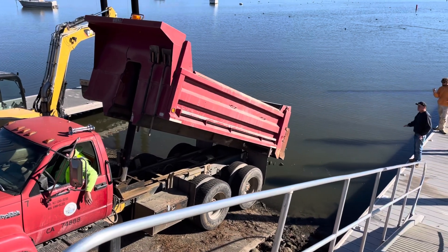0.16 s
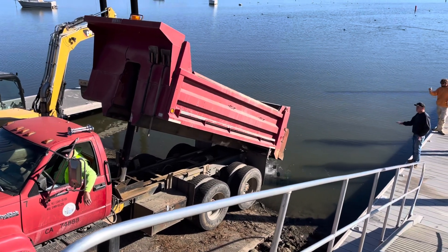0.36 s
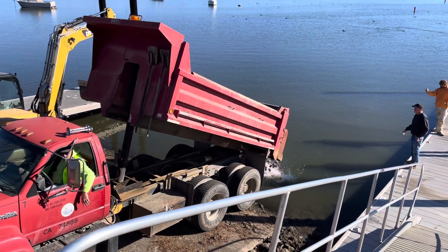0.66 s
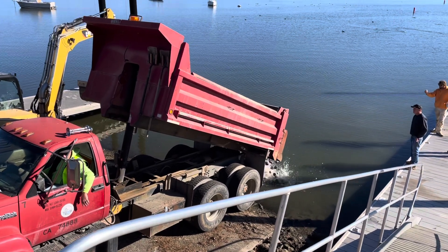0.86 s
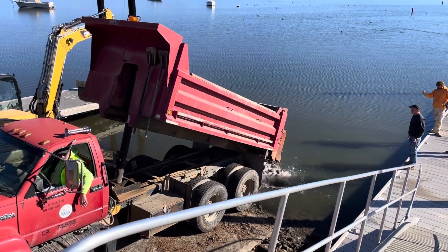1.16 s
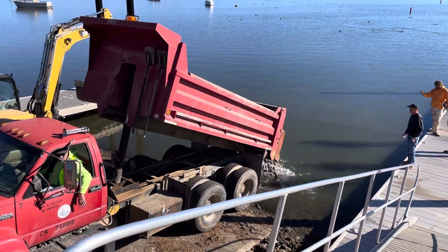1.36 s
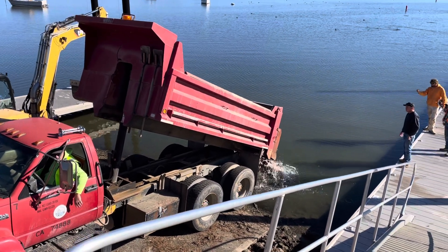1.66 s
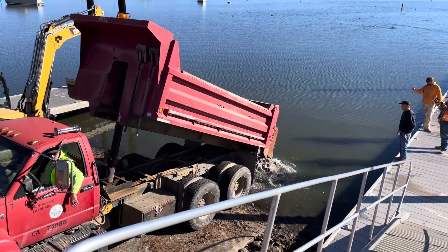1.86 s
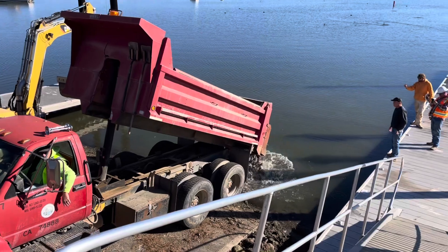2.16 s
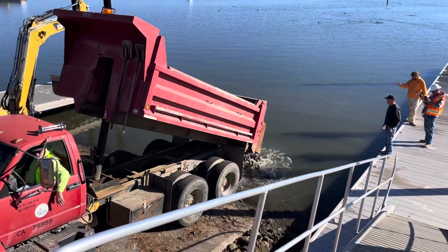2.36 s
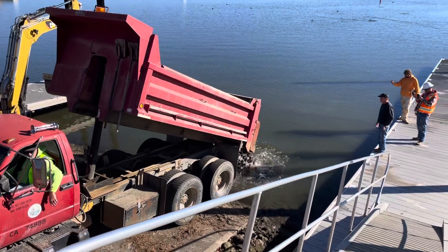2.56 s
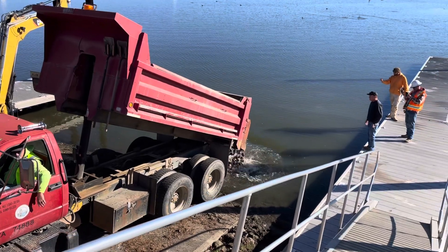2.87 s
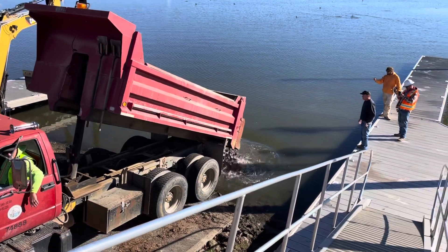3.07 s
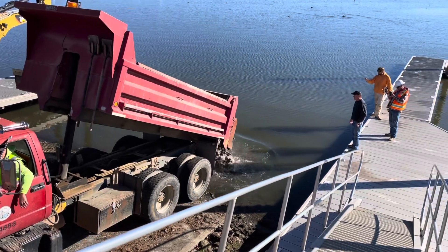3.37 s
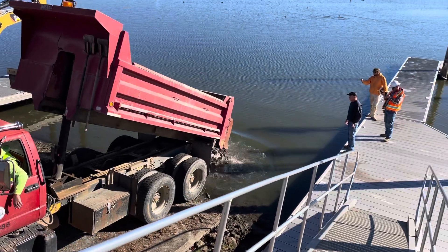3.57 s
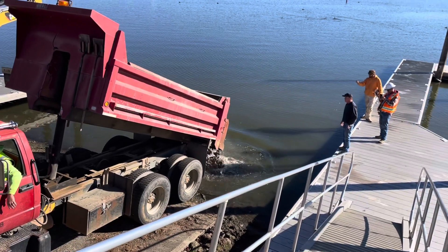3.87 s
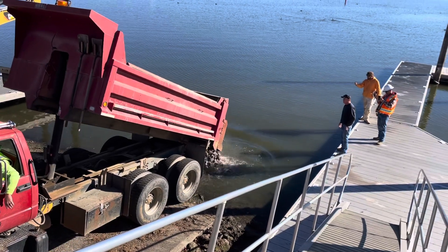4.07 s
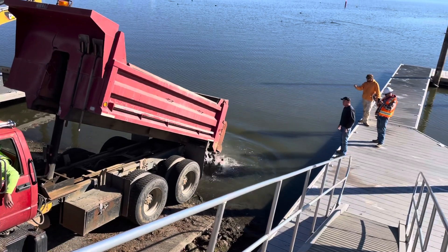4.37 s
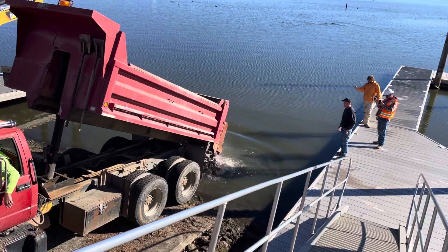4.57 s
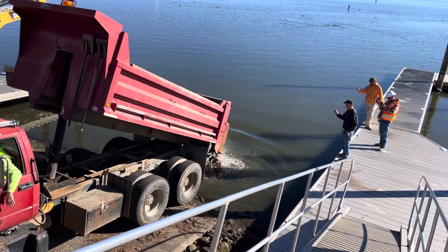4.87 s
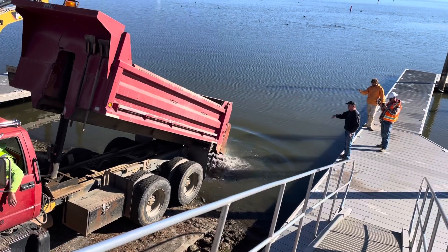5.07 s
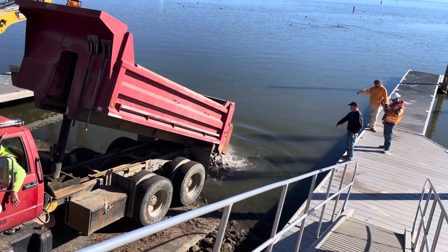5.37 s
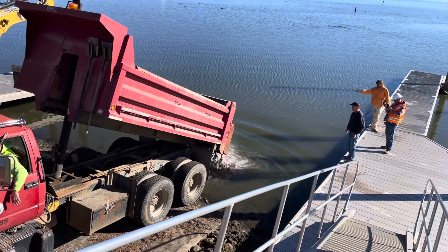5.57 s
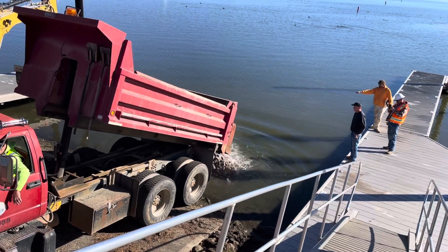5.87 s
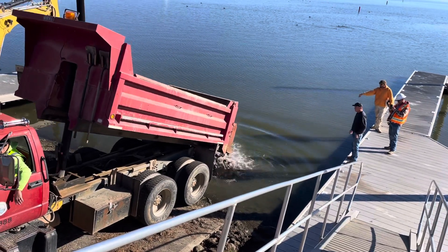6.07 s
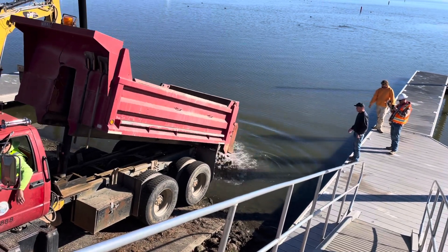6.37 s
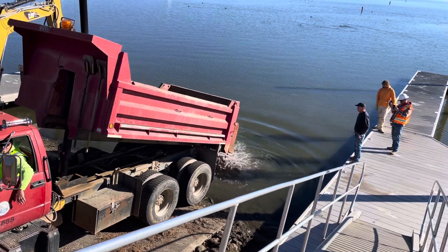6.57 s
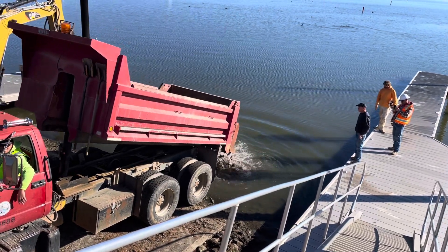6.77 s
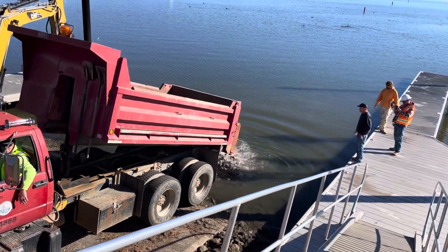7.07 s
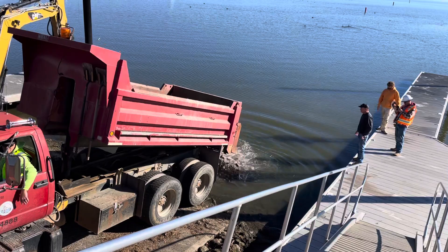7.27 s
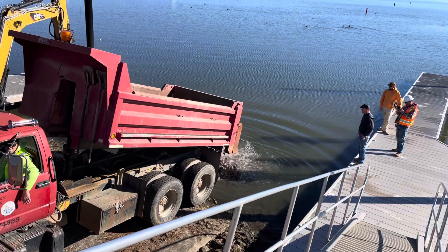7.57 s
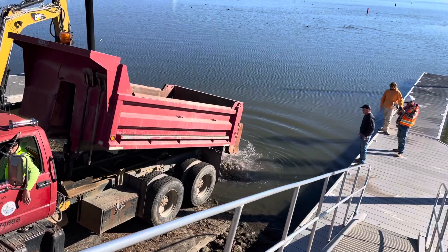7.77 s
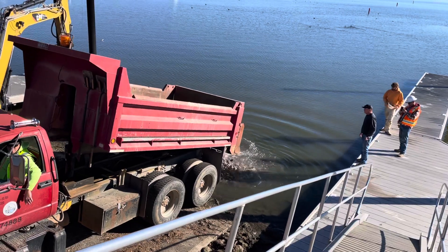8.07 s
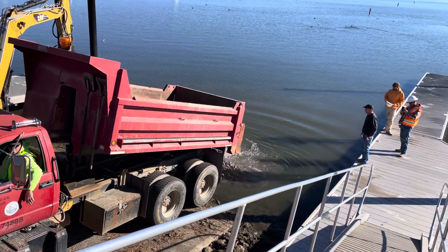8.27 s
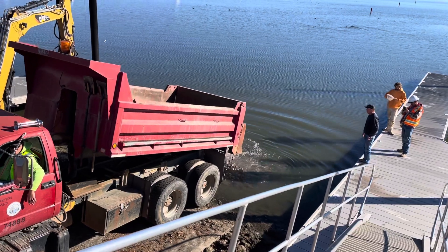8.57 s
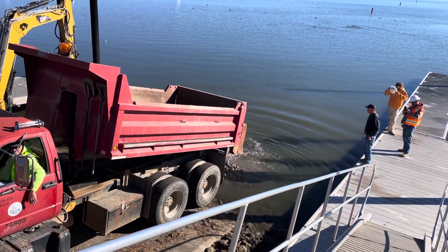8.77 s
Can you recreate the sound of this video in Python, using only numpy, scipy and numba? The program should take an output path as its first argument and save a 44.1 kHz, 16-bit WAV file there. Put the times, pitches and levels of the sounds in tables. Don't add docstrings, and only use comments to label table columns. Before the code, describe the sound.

Outdoors at a lakeside ramp, a truck tips crushed rock into the water. It starts loudest, with heavy bangs on the steel bed and dense stone clatter, then runs as a rough, surging rush with thin spray hiss. After about seven seconds it thins to separate knocks and ticks over diesel idle. Stereo phone some metres away.

```python
import sys
import numpy as np
from scipy import signal
from scipy.fft import rfft, irfft
from scipy.io import wavfile
from scipy.ndimage import uniform_filter1d
from numba import njit

SR = 44100
rng = np.random.default_rng(int(sys.argv[2]) if len(sys.argv) > 2 else 0)


def amplitude_ratio(level_db):
    exponent = np.asarray(level_db, float) / 20
    return 10 ** exponent


def pcm_store(signal):
    levels = np.round(np.clip(np.atleast_2d(signal), -1, 1) * 32767)
    wavfile.write(sys.argv[1], SR, levels.astype(np.int16).T)


N = 394075
PLACES = 6

# time in seconds, flow of rock in dB, share of big blocks in dB, splash in dB.
FLOW = [(0, -19.5, 4, -49.5), (.4, -21, -4, -54), (.45, -18.5, -2, -48.5), (.88, -19, 0, -52.5),
        (.98, -21.5, 1, -53), (1.5, -21.5, -0.5, -54.5), (2.05, -22.5, -0.5, -54), (2.75, -22.5, -2, -51.5),
        (4.1, -24, -1.5, -52), (5.3, -23, -3.5, -52.5), (6.05, -22.5, -5, -52.5), (6.25, -23.5, -1, -55),
        (6.55, -23, -1, -55), (6.85, -27, -0.5, -61), (7.4, -32.5, 0, -61.5), (7.75, -33, 1.5, -67),
        (8.0, -44, 8, -68), (8.55, -51, 6, -69), (8.94, -50.5, -4, -69)]
# start in seconds, level in dB, fade in seconds, share of big blocks in dB.
SLUMPS = [(.03, -22, 0.021, -17), (.17, -16.5, 0.029, -6), (0.201, -13, 0.012, 9), (.32, -15.5, 0.034, -1),
          (.56, -20, 0.024, 1), (.68, -24, 0.028, -6), (.775, -16.5, 0.028, -11.5), (1.08, -28, 0.05, -7),
          (1.2, -26, 0.064, -6), (1.3, -29, 0.043, -5), (1.568, -24.5, 0.26, -1.5),
          (2.28, -21.5, 0.048, -2), (2.48, -27.5, 0.054, -24), (2.63, -26, 0.036, 0), (2.73, -27, 0.036, 1),
          (2.79, -23, 0.028, -3), (2.87, -27, 0.04, -3), (2.96, -27, 0.049, -3), (3.3, -34, 0.042, -7),
          (3.42, -25, 0.081, -6), (3.6, -33, 0.023, -8), (3.77, -23.5, .04, -5), (3.98, -26, 0.043, -5),
          (4.5, -22, 0.047, 0), (4.63, -31, 0.046, 7), (4.88, -24.5, 0.061, -1), (5.149, -22, 0.057, -4),
          (5.35, -29, 0.025, 8), (5.5, -36, 0.033, -3), (5.83, -23.5, 0.043, 5.5),
          (5.9, -23.5, 0.083, -1.5), (6.2, -28.5, .04, -2), (6.48, -25.5, 0.047, 0), (6.61, -30, .04, -4),
          (7.02, -35, 0.09, 6.5), (7.44, -40, 0.072, 13.5), (7.55, -33, 0.12, 1), (7.68, -32, 0.052, 5.5),
          (7.8, -31.5, 0.048, -9), (7.885, -34.5, 0.064, -12), (7.995, -34.5, 0.11, -7),
          (8.13, -30.5, 0.039, -2), (8.232, -33.5, 0.086, 2.5), (8.392, -32.5, 0.048, 5.5),
          (8.48, -42, 0.042, 5), (8.663, -31.5, 0.035, 3.5), (8.712, -35, 0.014, -2)]
# frequency in Hz, level in dB per Hz.
BED_COLOUR = [(15, -66), (25, -51), (72, -10), (135, -4.5), (227, 0.5), (398, -2), (469, -2.5), (768, -3),
              (948, -4), (1350, -6), (1740, -9), (2600, -12), (6800, -30), (8840, -12.5), (15000, -120)]
# frequency in Hz, time to fade by 60 dB in seconds.
BED_RING_TIME = [(60, 0.29), (250, 0.17), (800, 0.089), (2000, 0.058), (6000, 0.067)]
# frequency in Hz, width in Hz, level in dB.
LOOSE_PANELS = [(212.6, 32, -8), (843, 32, -14.5)]
# time in seconds, peak in dB, pitch in Hz.
THUDS = [(0.037, -9, 1110), (0.159, -11, 1270), (0.215, -2, 1310), (0.343, -2, 1040), (0.452, -3, 1340),
         (0.689, -7, 1320), (0.768, 0, 1310), (0.789, -12, 1290), (1.172, -4.5, 1290), (1.215, -6, 1030),
         (1.3, -6, 1330), (1.338, -11, 867), (1.493, -13, 743), (1.586, -21, 1270), (1.616, -22, 1320),
         (1.731, -10.5, 1050), (1.757, -4, 1260), (1.885, -10, 759), (1.929, -18.5, 1600), (2.142, -8, 678),
         (2.241, -11, 1500), (2.534, -14, 1490), (2.623, -11, 818), (2.796, -10, 1300), (2.816, -14, 1340),
         (2.974, -4, 1400), (3.03, -11, 552), (3.22, -6, 592), (3.425, -9, 1320), (3.452, -12, 1330),
         (3.553, -12, 606), (3.628, -6, 1290), (3.784, -6, 685), (4.025, -13, 1330), (4.045, -6, 732),
         (4.166, -11, 1340), (4.329, -10, 759), (4.366, -7, 1230), (4.525, -7, 1300), (4.756, -13, 1360),
         (5.252, -10, 1390), (5.365, -5, 493), (5.448, -11, 1280), (5.595, -9, 1360), (5.924, -12, 1310),
         (6.122, -12, 856), (6.19, -13, 719), (6.431, -4, 813), (6.622, -19, 750), (6.649, -12, 517)]
# time in seconds, peak in dB, pitch in Hz.
TICKS = [(0.3367, -9, 2090), (2.5386, -18, 2290), (3.2899, -16, 2740), (3.3204, -17, 2220),
         (3.6255, -8, 1950), (3.8152, -19, 2030), (4.1305, -18, 1900), (4.225, -6, 1900),
         (4.8504, -16, 2080), (4.9082, -15, 1900), (5.1158, -9, 1900), (5.521, -20, 2000),
         (5.6496, -5, 2080), (5.851, -16, 2000), (5.907, -10, 2380), (5.9898, -13, 2240),
         (6.2687, -16, 2620), (6.3006, -15, 2710), (6.6338, -9, 2650), (6.754, -16, 1920),
         (6.7984, -27, 2650), (6.8184, -21, 2070), (6.8633, -17, 2020), (6.993, -18, 2190),
         (7.2005, -19, 2330), (7.2374, -20, 2800), (7.4959, -17, 2020), (7.595, -22, 2080),
         (7.7797, -33, 1980), (7.9294, -21, 2500), (8.0426, -22, 2190), (8.1434, -22, 2270),
         (8.1484, -15, 2910), (8.18, -7.5, 2770), (8.3439, -24, 2510), (8.4692, -25, 2310),
         (8.486, -26, 2660), (8.5071, -24, 2680), (8.6218, -24, 2340), (8.7204, -14, 2840),
         (8.8687, -32, 1940)]
# time in seconds, click in dB, pitch in Hz, blow on the plates in dB.
RUSH_KNOCKS = [(0.045, -7, 1890, -7), (0.1491, -28, 2230, -1), (0.2034, -12, 2130, 8.5),
               (0.4176, -13.5, 2130, 8.5), (0.518, -9.5, 2280, 0), (0.7905, -8, 1800, 2),
               (0.862, -13, 2720, 5), (1.1404, -10, 1820, -10), (1.3327, -14, 2690, 4),
               (1.7609, -16, 2180, 3.5), (2.3255, -12, 2170, 4), (2.5386, -28, 2290, -11),
               (2.702, -10, 2220, -5), (2.7463, -15.5, 1880, 5.5), (2.8804, -25, 2220, 1),
               (2.9706, -10, 2200, -14), (3.3593, -12, 2230, -1), (3.698, -15, 2070, 2),
               (3.7845, -16, 2460, -4), (4.2874, -18, 2050, 1), (5.1705, -10, 2720, -16),
               (6.0724, -31, 1700, -1.5), (6.2176, -17, 1930, 7), (6.5315, -15, 2430, -6),
               (6.6154, -15, 2610, -12), (6.8769, -29, 2030, 16), (7.0085, -21.5, 1920, 6.5),
               (7.0568, -20.5, 2150, 7), (7.1342, -16, 2490, -5), (7.2175, -23, 1940, 8)]
LAST_KNOCKS = [(7.2883, -23, 2000, 4), (7.3487, -24, 2320, 11), (7.3885, -16, 3240, -13),
               (7.418, -17, 3600, -5), (7.454, -19, 1980, 4), (7.5128, -14.5, 2100, 0.5),
               (7.5408, -18, 2770, 2), (7.6244, -16, 2020, 4.5), (7.7274, -27, 1850, -5),
               (7.8063, -18, 2210, -9), (7.89, -20, 3070, -7), (7.9556, -15, 2580, -4),
               (7.998, -19, 2210, -3), (8.055, -16, 2260, -5), (8.134, -18, 1700, 1),
               (8.1405, -10.5, 2260, -7), (8.1924, -26, 2080, 5), (8.2724, -33, 2010, 0),
               (8.3443, -19, 2510, 0), (8.4028, -20, 1980, 4), (8.4294, -31, 2560, -8),
               (8.4834, -29, 2040, 12), (8.5071, -23, 2680, 3), (8.5835, -36, 2570, -6),
               (8.624, -24, 2340, -4), (8.6655, -30, 1950, 12), (8.7207, -16, 2950, -2),
               (8.728, -20, 3280, -11)]
# time in seconds, change in
# dB.
BOOM_SHIFTS = [(0.519, 2.5), (1.187, -3.5), (1.505, -2.5), (1.718, 1.5), (2.028, -1), (2.264, 4.5),
               (2.477, -3), (2.742, 3.5), (3.237, -3), (3.613, -4), (3.763, -4), (4.091, -2.5),
               (4.449, 2.5), (4.52, -2.5), (4.647, 1), (4.761, -4), (4.971, -1.5), (5.444, -5.5),
               (5.619, -3), (5.789, 4), (5.881, -5), (6.088, -2.5), (6.171, 0.5), (6.32, -4), (6.483, 1),
               (6.834, 2.5), (6.96, -2.5), (7.039, 2.5), (7.499, -3.5), (7.571, 3), (7.689, -3),
               (7.766, 4.5), (8.014, 2.5), (8.146, -1), (8.235, 0.5), (8.369, -2), (8.756, 4.5), (8.911, 4)]
CLATTER_SHIFTS = [(0.241, -2.5), (0.4, 3.5), (0.47, -3), (0.631, -6), (0.746, 0.5), (0.934, 4), (1.035, 2),
                  (1.127, -4.5), (1.239, 0.5), (1.278, -5), (1.498, -0.5), (1.619, -5), (2.007, -6),
                  (2.176, 3.5), (2.225, -0.5), (2.294, -6), (2.447, -2), (2.627, -1), (2.664, 5),
                  (2.749, 0), (2.868, -3.0), (3.149, -5), (3.222, -1), (3.329, -6), (3.68, -2),
                  (3.926, 3.5), (4.242, 3), (4.291, 0), (4.745, -3.5), (4.892, -2), (5.119, 2.5),
                  (5.275, 3.5), (5.784, 2.5), (5.832, 2.5), (5.878, -1), (5.989, -4), (6.054, -3.5),
                  (6.548, 2.5), (6.794, 0), (7.025, 2.5), (7.077, 0), (7.187, 3.0), (7.273, -3.0),
                  (7.329, 4.5), (7.392, -1), (7.458, -5), (7.501, 1), (7.544, 2), (7.642, 2), (7.834, 3.0),
                  (7.963, -5), (8.008, 1), (8.053, -2.0), (8.176, 1), (8.242, -3), (8.334, 3.5), (8.4, 6),
                  (8.483, -7)]
CRACKLE_SHIFTS = [(0.231, -3.5), (0.27, 5), (0.474, -1.5), (0.961, -2.5), (1.047, 3), (1.447, 0),
                  (2.002, -2), (2.187, 4), (2.254, 3.5), (2.375, 3.0), (2.445, -5.0), (2.491, 4),
                  (2.564, 4.5), (3.027, 2), (3.137, -0.5), (3.244, -3.5), (3.594, -2), (3.766, -1.5),
                  (3.826, 0.5), (3.883, -2), (3.953, 2), (4.03, 3.5), (4.067, -1), (4.102, -4),
                  (4.182, 3.5), (4.434, 1.5), (4.575, -1), (4.794, 0.5), (5.133, 3), (5.179, -3.5),
                  (5.359, -3), (5.419, -3.5), (5.692, 2.5), (6.062, -2), (6.134, 2), (6.291, 2),
                  (6.343, -2), (6.377, 1), (6.563, 1.5), (6.915, 2), (7.033, 4.5), (7.279, 1), (7.312, 4.5),
                  (7.586, -2), (7.814, -0.5), (7.868, -3.5), (7.908, -2.5), (8.017, 0), (8.052, 0),
                  (8.097, -6), (8.142, 1.5), (8.24, -2), (8.281, 2), (8.44, 2), (8.529, 1), (8.595, 5.5),
                  (8.649, 8), (8.77, -3.5), (8.815, -7), (8.904, 12)]
# width in Hz, frequency in Hz and level in dB before, frequency in Hz and level in dB after.
QUAY_ECHO = [(176, 555, -10.5, 490, 0.5), (198., 430, 1, 810, 2), (69, 103, -5.5, 175, 2.7),
             (610, 4720, 6, 4700, 3), (150, 2770, 3, 2820, 2), (250, 2900, -3, 2900, -2.5),
             (200, 2400, -2.5, 1700, -1), (70, 382, -2, 387, -2), (50, 322, 1.5, 308, 1)]
WATER_ECHO = [(200., 1040, 0.5, 936, -5), (141, 1315, 4.5, 1350, 5.5), (200., 1510, -2.5, 1700, 0)]
# frequency in Hz, level in dB per Hz.
SPRAY_COLOUR = [(3000, 1.5), (6000, 9), (8000, 11), (10500, 6.5), (12500, 2), (14500, -2), (15100, -13),
                (15300, -17)]
# frequency in Hz, level in dB per Hz.
IDLE_COLOUR = [(25, -44), (60, 7.5), (130, 0.5), (200, 7.5), (500, -1), (1000, -0.5), (1500, -4),
               (2100, -14), (2600, -7), (2850, -3), (3050, -14), (4600, -18), (7000, -57), (8000, -70)]
# start in seconds, length in seconds, pitch in Hz, level in dB.
SQUEAKS = [
    (6.59, 0.056, 8850, -49),
    (6.655, .07, 8800, -47),
    (6.78, .06, 8750, -48),
    (8.5, .05, 9860, -55),
]
# frequency in Hz, likeness from 0 to 1.
PORT_LIKENESS = [(60, 0.89), (130, 0.99), (250, 0.98), (600, 0.93), (1300, 0.84), (3000, 0.76),
                 (6000, 0.65), (7800, 1), (11500, 0.74), (14000, 0.66)]
# frequency in Hz, left minus right in dB.
PORT_BALANCE = [(60, 1.5), (110, 0.37), (200, 1.4), (360, 1.9), (660, -2), (1200, -2), (2180, -1.9),
                (3980, 1.9), (7240, 1.2), (13200, -1)]
# frequency in Hz, lead of the left in radians.
PORT_LEAD = [(100, 0), (430, -.2), (1400, 0), (3000, .7), (5000, .6), (6000, 0), (7000, -1.5), (7800, -3),
             (8700, -3.3), (10300, -5.6), (11000, -6.2), (12200, -6.4), (13000, -7.6), (13900, -9.2),
             (16000, -9.5)]


def on_hz(table, hz):
    f, v = np.transpose(table)
    return np.interp(np.log(np.maximum(hz, 1)), np.log(f), v)


def unit(x):
    return x / np.sqrt(np.mean(x ** 2))


def coloured(x, gain):
    n = x.shape[-1]
    return irfft(rfft(x) * gain(np.fft.rfftfreq(n, 1 / SR)), n)


def walk(rate):
    hold = int(SR / rate)
    levels = rng.standard_normal(N // 50 + 1)[:N // hold + 1]
    return unit(uniform_filter1d(np.repeat(levels, hold), hold)[:N])


def ports(shape):
    shared, left, right = rng.standard_normal((3, *shape))
    own = coloured(np.array([left, right]), lambda hz: np.sqrt(1 - on_hz(PORT_LIKENESS, hz)))
    return coloured(shared, lambda hz: np.sqrt(on_hz(PORT_LIKENESS, hz))) + own


def load():
    boom_db, click_db = -1.5, -5
    click_loss = 0.25
    slump_rise_s, slump_splash_db = 0.013, -32.5
    t = np.arange(0, N, 32) / SR

    def layer_powers(db, big_db, wet_db):
        clicks = db + click_db - click_loss * big_db
        return amplitude_ratio(np.array([db + boom_db + big_db, db, clicks, wet_db])) ** 2

    s, *columns = np.transpose(FLOW)
    power = layer_powers(*(np.interp(t, s, c) for c in columns))
    for s, db, fade_s, big_db in SLUMPS:
        age = np.maximum(t - s, 0)
        swell = 3 * (1 - np.exp(-age / slump_rise_s)) ** 2 * np.exp(-2 * age / fade_s)
        power = power + layer_powers(db, big_db, db + slump_splash_db)[:, None] * swell
    return [np.interp(np.arange(N) / SR, t, 10 * np.log10(p)) for p in power]


def impacts(rate, scatter_db):
    when = rng.random((PLACES, N))
    size = rng.exponential(size=(PLACES, N))
    direction = rng.choice([-1, 1], (PLACES, N))
    blows = (when < rate / SR) * amplitude_ratio(scatter_db * np.minimum(size, 5)) * direction
    return unit(blows / np.sqrt(rate)) / np.sqrt(PLACES)


def bed_rings(lo_hz, hi_hz):
    t = np.arange(16384) / SR

    def share(f):
        edges = (1 + (lo_hz / (f + 1)) ** 6) * (1 + (f / hi_hz) ** 6)
        return amplitude_ratio(on_hz(BED_COLOUR, f)) / np.sqrt(edges)

    noise, out = coloured(ports((PLACES, len(t))), share), 0
    for hz in 30 * 2 ** np.arange(0, 8.5, .5):
        band = coloured(noise, lambda f: np.cos(np.pi * np.clip(np.log2((f + 1) / hz), -.5, .5)) ** 2)
        t60 = on_hz(BED_RING_TIME, hz)
        out = out + band * amplitude_ratio(-60 * t / t60) / np.sqrt(t60)
    power = uniform_filter1d(np.mean(np.abs(rfft(out)) ** 2, axis=(0, 1)), size=13)
    out = coloured(out, lambda f: share(f) / np.sqrt(power))[..., :12000]
    return out / np.sqrt(np.mean(np.sum(out ** 2, axis=-1)))


def strike(blows, rings):
    return signal.fftconvolve(blows[None], rings, axes=-1)[..., :N].sum(axis=1)


def ring(x, hz, width_hz):
    r = np.exp(-np.pi * width_hz / SR)
    return unit(signal.lfilter([1, 0, -1], [1, -2 * r * np.cos(2 * np.pi * hz / SR), r * r], x))


def lone_hits(table, trim_db, cycles, plate_db):
    sound, blows = np.zeros(N + SR), np.zeros((PLACES, N))
    t = np.arange(800) / SR
    for k, (s, db, hz) in enumerate(table):
        chance = rng.random(3)
        pulse = np.sin(2 * np.pi * hz * t) * np.exp(-t * hz / cycles) * np.sign(chance[0] - .5)
        pulse = pulse / np.abs(pulse).max()
        rebound_s = (1.52 + 3 * chance[1]) / hz
        for lag, size in ((0, 1), (rebound_s, 1.1 * chance[2])):
            i = int((s + lag) * SR)
            sound[i:i + len(t)] += amplitude_ratio(db + trim_db) * size * pulse
        blows[k % PLACES, int(s * SR)] = amplitude_ratio(db + trim_db + plate_db)
    return sound[:N], blows


def knocks():
    chatter_s, chatter_db = .002, -6.5
    bounce_s, rush_bounce_db, last_bounce_db = .018, -0.5, -7
    grit_share, grit_s = 0.2, 0.0039
    clicks, blows = np.zeros(N + SR), np.zeros((PLACES, N + SR))
    t = np.arange(600) / SR
    crack_fade = np.exp(-t / 0.00044) + grit_share * np.exp(-t / grit_s)
    for k, (s, db, hz, plate_db) in enumerate(list(RUSH_KNOCKS) + list(LAST_KNOCKS)):
        bounce_db = rush_bounce_db if k < len(RUSH_KNOCKS) else last_bounce_db
        wait, strength, tune = rng.random((9, 3)).T
        lags = np.r_[0, -np.log(wait) * np.repeat([chatter_s, bounce_s], [3, 6])]
        sizes = np.r_[1, amplitude_ratio(np.repeat([chatter_db, bounce_db], [3, 6])) * strength]
        pitches = hz * np.r_[1, .6 + 1.1 * tune]
        for lag, size, pitch in zip(lags, sizes, pitches):
            i = int((s + lag) * SR)
            tone = np.sin(2 * np.pi * pitch * t) * np.exp(-t * pitch / 2.6)
            crack = uniform_filter1d(rng.standard_normal(len(t)), size=4) * crack_fade
            clicks[i:i + len(t)] += amplitude_ratio(db) * size * (0.78 * tone + 0.5 * crack)
            blows[k % PLACES, i] += amplitude_ratio(db + plate_db + 11.5) * size
    thin = lambda f: 1 / np.sqrt((1 + (900 / (f + 1)) ** 4) * (1 + (f / 5600) ** 12))
    return coloured(clicks[:N], thin), blows[:, :N]


def shifts(table, length_s):
    t = np.arange(0, N, 32) / SR
    db = sum(db * np.exp(-.5 * ((t - s) / length_s) ** 2) for s, db in table)
    return amplitude_ratio(np.interp(np.arange(N) / SR, t, db))


def rock(boom_db, clatter_db, click_db):
    deepen = 1 + .2 * np.clip(-23 - clatter_db, 0, 15)
    surge_db = (.35 * walk(12) + .6 * walk(35)) * deepen
    block_rate = 500 * amplitude_ratio(.4 * (clatter_db + 22))
    blocks = impacts(block_rate, 3.1) * amplitude_ratio(0.28 * surge_db + 0.17 * walk(20))
    gravel_rate = 600 * amplitude_ratio(.4 * (click_db + 25) + 1.5 * surge_db)
    gravel = impacts(gravel_rate, 2.56) * amplitude_ratio(surge_db)

    knock_clicks, knock_blows = knocks()
    tick_clicks, tick_blows = lone_hits(TICKS, trim_db=-5, cycles=0.98, plate_db=7)
    thud_clicks, thud_blows = lone_hits(THUDS, trim_db=-7, cycles=2.6, plate_db=6)
    clicks = knock_clicks + tick_clicks + thud_clicks
    blows = knock_blows + tick_blows + thud_blows

    boom = strike(blocks * amplitude_ratio(boom_db - 0.53) + blows * amplitude_ratio(-5.5), bed_rings(10, 584))
    mixed = (0.74 * blocks + 0.65 * gravel) * amplitude_ratio(clatter_db)
    clatter = strike(mixed + blows * amplitude_ratio(-1.5), bed_rings(422, 1790))
    crackle = strike(gravel * amplitude_ratio(click_db + 1.8) + blows * amplitude_ratio(-2.5), bed_rings(1784, 6630))
    shaken = (blocks * amplitude_ratio(boom_db)).sum(axis=0)
    panels = sum(amplitude_ratio(db) * ring(shaken, hz, width) for hz, width, db in LOOSE_PANELS) * shaken.std()

    boom = (boom + panels) * shifts(BOOM_SHIFTS, length_s=0.022)
    clatter = clatter * shifts(CLATTER_SHIFTS, length_s=0.0097)
    crackle = (crackle + clicks) * shifts(CRACKLE_SHIFTS, length_s=0.0088)
    return coloured(boom + clatter + crackle, lambda f: 1 / np.sqrt(1 + (f / 7200) ** 24))


@njit
def band_pass(x, hz, width):
    y, b, l = np.empty(len(x)), 0., 0.
    for i in range(len(x)):
        g, k = np.tan(np.pi * hz[i] / SR), width / hz[i]
        v = (b + g * (x[i] - l)) / (1 + g * (g + k))
        b, l, y[i] = 2 * v - b, l + 2 * g * v, k * v
    return y


def moving_echoes(x):
    def step(s, ease_s):
        return .5 + .5 * np.tanh((np.arange(N) / SR - s) / ease_s)

    swing = step(2.46, 0.3)
    roll = step(1.826, 0.05) - step(2.65, 0.05)
    clear = 1 - 0.3 * roll - 0.22 * step(6.1, 0.48)
    for table, lift, depth in ((QUAY_ECHO, 1, 1), (WATER_ECHO, 1 + 0.18 * roll, clear)):
        for width, hz0, db0, hz1, db1 in table:
            hz = (hz0 + (hz1 - hz0) * swing) * lift * (1 + .03 * walk(9))
            db = (db0 + (db1 - db0) * swing) * depth * (1 + .3 * walk(30))
            x = x + (amplitude_ratio(db) - 1) * np.array([band_pass(side, hz, width) for side in x])
    return x


def spray(level_db):
    lapping_db = -62
    drops = 1 + 0.49 * (rng.random(N) < .03) * rng.exponential(size=N)
    hiss = unit(coloured(ports((N,)) * drops, lambda hz: amplitude_ratio(on_hz(SPRAY_COLOUR, hz))))
    splash_db = level_db + 9.5 + 0.43 * walk(12) + 1.3 * walk(54)
    return hiss * np.hypot(amplitude_ratio(splash_db), amplitude_ratio(lapping_db))


def engines():
    idle_db, firing_hz = -39.5, 36.3
    firing_phase = 2 * np.pi * np.cumsum(firing_hz * (1 + 0.0036 * walk(1.64))) / SR
    throb = 1 + 0.23 * np.sin(firing_phase)
    roar = unit(coloured(ports((N,)), lambda hz: amplitude_ratio(on_hz(IDLE_COLOUR, hz))))
    return roar * throb * amplitude_ratio(idle_db + 0.48 * walk(5.9) + 1.9 * walk(25))


def squeaks():
    t, out = np.arange(N) / SR, 0
    for s, length, hz, db in SQUEAKS:
        on = np.clip((t - s) / .005, 0, 1) * np.clip((s + length - t) / .02, 0, 1)
        tone = np.sin(2 * np.pi * np.cumsum(hz + 60 * walk(70)) / SR)
        out = out + on * amplitude_ratio(db + 4.7 * walk(60)) * tone
    return out * np.array([[1], [.35]])


def scene():
    boom_db, clatter_db, click_db, spray_db = load()
    stones = moving_echoes(rock(boom_db, clatter_db, click_db))
    return stones + spray(spray_db) + engines() + squeaks()


def low_pass(x):
    return signal.sosfilt(signal.butter(12, 15760, fs=SR, output="sos"), x)


def record(dry):
    bass = lambda hz: 1 / np.sqrt(1 + (55 / (hz + 1)) ** 6)
    tilt = lambda hz: amplitude_ratio(on_hz(PORT_BALANCE, hz) / 2) * np.exp(.5j * on_hz(PORT_LEAD, hz))
    left = coloured(dry[0], tilt)
    right = coloured(dry[1], lambda hz: 1 / tilt(hz))
    heard = coloured(np.array([left, right]), bass)
    return low_pass(1.498 * np.tanh(heard / 1.45))


dry = scene()
out = record(dry)
pcm_store(out)
```